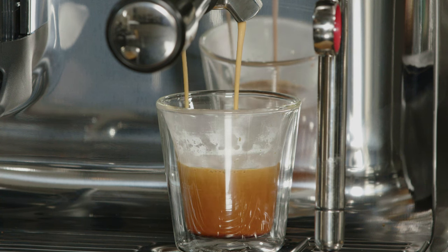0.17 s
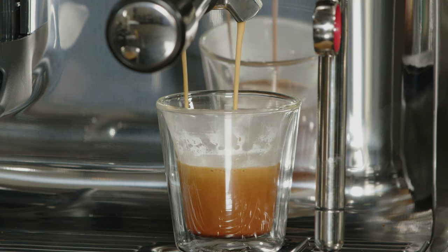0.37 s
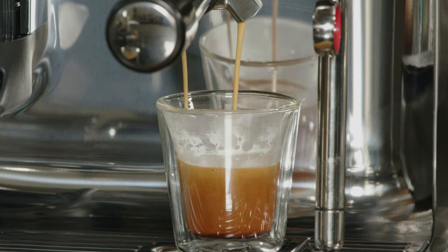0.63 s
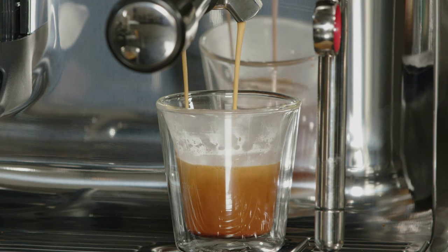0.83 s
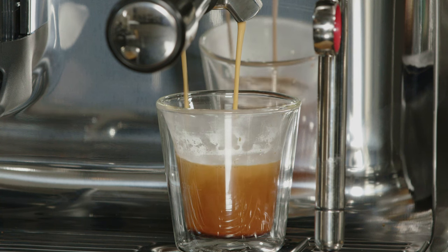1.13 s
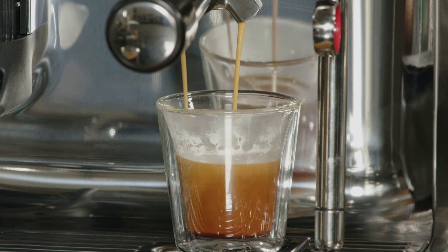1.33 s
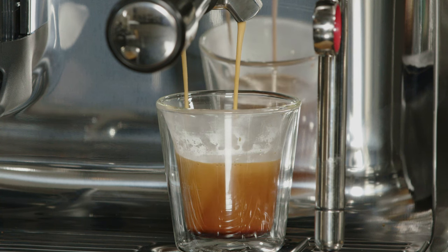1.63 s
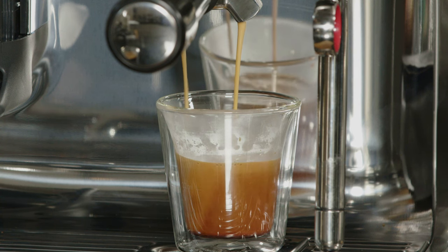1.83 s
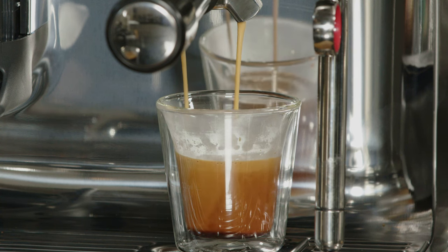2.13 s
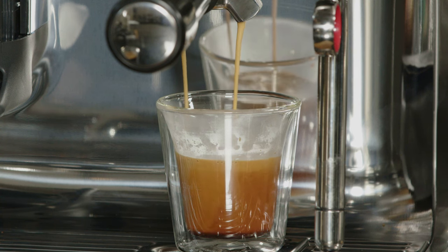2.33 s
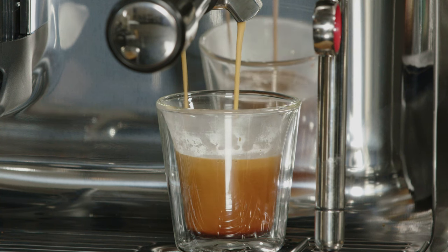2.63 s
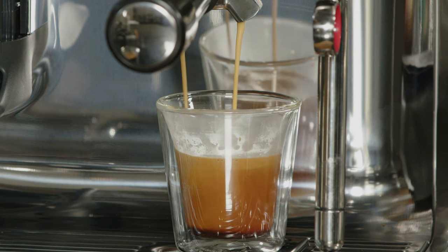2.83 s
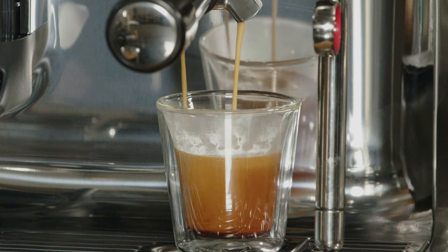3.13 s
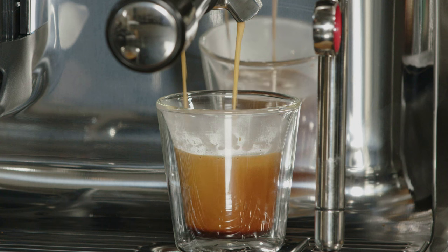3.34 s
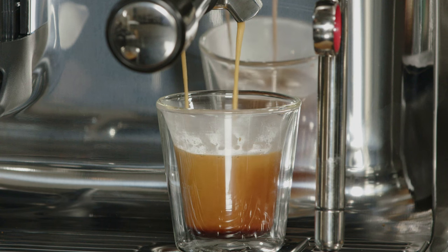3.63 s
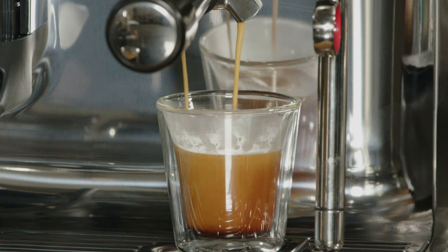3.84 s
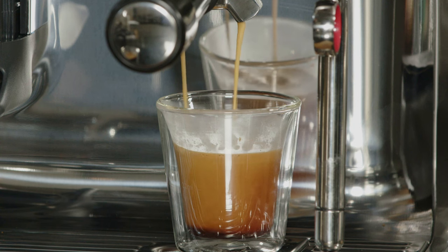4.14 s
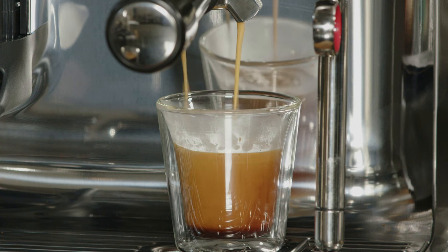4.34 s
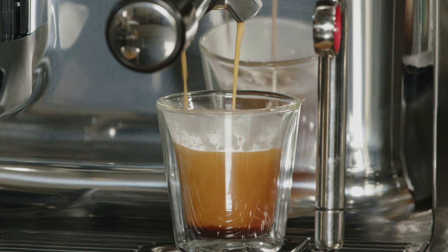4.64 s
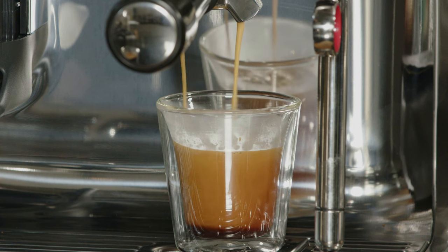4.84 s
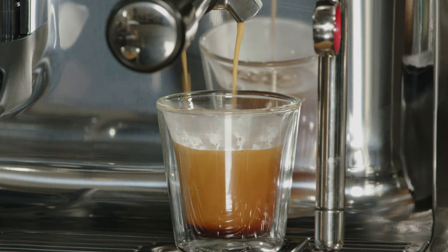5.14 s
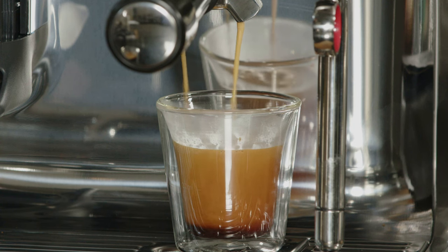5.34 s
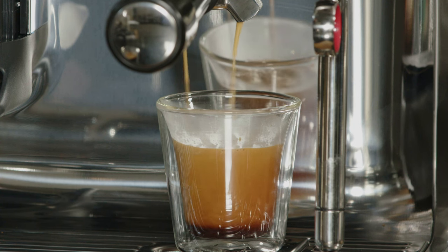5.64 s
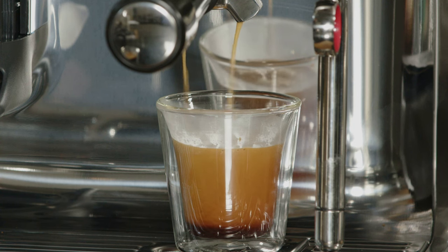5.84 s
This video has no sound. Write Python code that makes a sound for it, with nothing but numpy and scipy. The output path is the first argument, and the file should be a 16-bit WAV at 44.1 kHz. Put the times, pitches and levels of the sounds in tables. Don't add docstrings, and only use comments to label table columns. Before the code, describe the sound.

Close to the microphone, an espresso machine's vibrating pump hums low and buzzy, wavering about five times a second with a loose casing rattle. After three seconds it settles into a steadier drone. Faint hiss and tiny water drips sit underneath. At five seconds it stops with a dull knock and a flurry of metallic clicks, leaving quiet kitchen air and a faint low rumble.

```python
import sys
import numpy as np
from scipy import signal
from scipy.fft import rfft, irfft
from scipy.io import wavfile
from scipy.ndimage import uniform_filter1d

SR = 44100
rng = np.random.default_rng(int(sys.argv[2]) if len(sys.argv) > 2 else 0)


def boost(x):
    u = np.asarray(x, float) / 20
    return 10 ** u


def inscribe(sig):
    pcm = np.round(np.clip(np.atleast_2d(sig).T, -1, 1) * 32767)
    wavfile.write(sys.argv[1], SR, pcm.astype(np.int16))


N = 263277
TIME = np.arange(N) / SR
MAINS_HZ, STOP_S = 60.006, 5.076
STROKES = MAINS_HZ * TIME - .05


def evened(x):
    return x / np.sqrt(np.mean(x ** 2) + 1e-20)


def coloured(x, hz, db):
    bins = np.fft.rfftfreq(len(x), 1 / SR)
    gain_db = np.interp(np.log(bins + 1), np.log(np.add(hz, 1)), db)
    return irfft(rfft(x) * boost(gain_db), len(x))


def resonate(x, hz, width):
    turn = np.exp(2j * np.pi * np.cumsum(hz * np.ones(len(x))) / SR)
    r = np.exp(-np.pi * width / SR)
    return 2 * (turn * signal.lfilter([1 - r], [1, -r], x / turn)).real


def resonate_twice(x, hz, width):
    return resonate(resonate(x, hz, width), hz, width)


def smooth_twice(x, size):
    return uniform_filter1d(uniform_filter1d(x, size), size)


def add(mix, s, sound):
    part = mix[round(s * SR):][:len(sound)]
    part += sound[:len(part)]


def ring(hz, t60, rise_s, tone_share, width_share):
    t = np.arange(round(.25 * SR)) / SR
    fuzz = resonate_twice(rng.standard_normal(len(t)), hz, width_share * hz)
    tone = tone_share * np.sin(2 * np.pi * hz * t) + (1 - tone_share) * evened(fuzz)
    return tone * boost(-60 * t / t60) * (1 - np.exp(-t / rise_s))


def per_stroke(spread_db):
    strengths = boost(spread_db * rng.standard_normal(int(STROKES[-1]) + 2))
    return strengths[np.floor(STROKES).astype(int) + 1]


def running(coast_s):
    return np.exp(-np.maximum(TIME - STOP_S, 0) / coast_s)


def slipping():
    # middle of the slip in seconds, depth from 0 to about 1.
    slips = [(0.13, 0.98), (0.35, 0.95), (0.52, 0.91), (0.73, 0.98), (0.94, 1.05), (1.14, 1.04),
             (1.36, 0.55), (1.55, 1.03), (1.77, 0.5), (1.94, 1.04), (2.15, 1.01), (2.33, 1.03),
             (2.55, 0.89), (2.72, 1.05), (2.95, 1.04), (3.15, 0.72)]
    slip_s = .043
    slip = sum(depth * np.exp(-((TIME - s) / slip_s) ** 4 / 2) for s, depth in slips)
    return uniform_filter1d(np.clip(slip, 0, 1), 900)


def settling():
    settle_at_s, settle_s = 3.1, 0.12
    return 1 - np.exp(-np.maximum(TIME - settle_at_s, 0) / settle_s)


def orders():
    # multiple of mains, dB gripping, dB slipping, dB settled.
    direct = [(1, -70, -66, -67), (2, -54, -52, -53), (6, -62, -65, -65), (7, -61, -63, -60),
              (8, -47, -49, -48), (10, -67, -69, -66), (11, -74, -75, -75), (14, -74, -83, -79),
              (17, -87, -81, -82), (19, -74, -75, -78), (21, -83, -82, -92), (22, -78, -77, -80),
              (25, -86, -84, -85), (26, -87, -87, -91), (27, -95, -89, -103), (28, -94, -97, -93),
              (29, -96, -100, -87)]
    shaken = [(3, -76, -82, -86), (4, -69, -70, -68), (5, -66, -73, -70), (9, -73, -72, -72),
              (12, -92, -80, -87), (13, -84, -72, -79), (15, -83, -81, -86), (16, -105, -85, -87),
              (18, -79, -81, -77), (20, -89, -86, -84), (23, -84, -96, -87), (24, -83, -89, -84)]
    # half multiple of mains, then dB as for the direct lines.
    alternate = [(3.5, -76, -75, -77), (4.5, -77, -79, -76), (5.5, -69, -74, -75), (8.5, -70, -71, -71),
                 (9.5, -85, -81, -83), (11.5, -84, -91, -85), (12.5, -94, -89, -85), (13.5, -90, -83, -84),
                 (20.5, -97, -101, -92), (28.5, -105, -96, -95), (29.5, -108, -98, -96)]
    # multiple of mains, level in dB.
    valve_lines = [(32, -96), (33, -94), (36, -92), (37, -100), (38, -98), (39, -94), (41, -100), (42, -88),
                   (43, -89), (44, -92), (45, -99), (46, -97), (47, -98), (48, -98)]
    slip_late_ms, casing_turn, shaken_turn, alternate_turn = 0.042, .3, 1.9, 2.15
    late = 2 * np.pi * MAINS_HZ * slip_late_ms / 1000
    lines = [(*row, late * row[0] + casing_turn * (row[0] > 2)) for row in direct]
    lines += [(*row, shaken_turn) for row in shaken]
    lines += [(*row, alternate_turn) for row in alternate]
    lines += [(k, db, db, db, late * k + casing_turn) for k, db in valve_lines]
    return lines


def hum():
    slip = np.roll(slipping(), round(0.01 * SR))
    settled, lines, out = settling(), orders(), np.zeros(N)
    arch = np.clip(1.15 * smooth_twice(slip, 2600), 0, 1) ** 2
    for (k, grip_db, slip_db, calm_db, lag), start in zip(lines, rng.random(len(lines))):
        glide = np.clip(.22 * (slip_db - grip_db - 2), 0, 1.6) * (1 - arch)
        change = boost(slip_db) * np.exp(1j * (glide - lag)) - boost(grip_db)
        early = boost(grip_db) + change * slip
        size = early + settled * (boost(calm_db) * np.exp(-.5j * lag) - early)
        if k < 15:
            offset = start
        elif k < 27:
            offset = .15 * start - .24 * k - .024 * (k - 20) ** 2
        else:
            offset = .15 * start + (np.cos(np.pi * k * .19) < 0) / 2
        phase = k * (STROKES - .17) + offset
        out += np.sqrt(2) * (size * np.exp(2j * np.pi * phase)).real
    return out * running(0.0012)


def rattle():
    # frequency in Hz, level unsettled in dB, level settled in dB.
    casing = [(40, -110, -110), (130, -81, -86), (200, -82, -86), (290, -82, -92), (380, -77, -87),
              (440, -76, -81), (490, -73, -79), (575, -83, -89), (790, -88, -98), (1100, -91, -97),
              (1350, -93, -100), (1650, -97, -104), (2100, -103, -108), (4000, -135, -135)]
    hz, loose_db, calm_db = np.transpose(casing)
    fall = 1.7 + np.exp(-(STROKES % 1) / 1.0)
    push = evened(rng.standard_normal(N) * fall * per_stroke(1.8))
    settled = settling()
    loose = coloured(push, hz, loose_db) * boost(2 * slipping())
    calm = coloured(push, hz, calm_db)
    per_band = np.sqrt(SR / 2 / 22)
    return per_band * (loose + settled * (calm - loose)) * boost(1.6 * (settled - 0.5)) * running(0.17)


def coasting():
    coast = (TIME > STOP_S) * running(0.07) * rng.standard_normal(N)
    return boost(-32) * resonate(resonate(coast, 422, 74), 443, 74)


def ticks():
    # frequency in Hz, width in Hz, level in dB.
    valve = [(2030, 330, -87), (2600, 720, -83), (3100, 700, -90), (3730, 360, -85.5), (4500, 1530, -87.5),
             (5540, 2000, -87.5), (7740, 370, -100), (8730, 380, -99), (7300, 3800, -91.5)]
    settled = settling()
    place = (STROKES - .08) % 1
    second_puff = 0.49 * (place > .16) * np.exp(-(place - .16) / 0.27)
    puffs = 0.18 + np.exp(-place / 0.093) + second_puff
    uneven = per_stroke(0.89) * boost(0.72 * np.sign(np.sin(np.pi * STROKES)))
    shape = uniform_filter1d(puffs, 30) * uneven
    repeated = rng.standard_normal(735)[(place * 735).astype(int)]
    fresh = rng.standard_normal(N)
    alike = .45 + .35 * settled
    low_drive = fresh * shape * boost(-2.5 * settled)
    high_drive = (alike * repeated + np.sqrt(1 - alike ** 2) * fresh) * shape
    out = np.zeros(N)
    for hz, width, db in valve:
        drive = high_drive if hz > 3400 else low_drive
        out += boost(db - 1.2 * settled * (hz < 3400)) * evened(resonate_twice(drive, hz, width))
    return out * boost(-.55 * settled - 2.0) * running(0.021)


def taps():
    # start in seconds, peak in dB, frequency in Hz.
    hard_strokes = [
        (0.889, -59, 3740),
        (0.9573, -60, 3280),
        (1.1189, -64, 3370),
        (2.8614, -65, 3730),
        (3.6178, -61, 3720),
        (3.793, -60, 3700),
        (3.929, -59.5, 4470),
    ]
    out = np.zeros(N)
    for s, db, hz in hard_strokes:
        add(out, s, boost(db - 6.0) * ring(hz, 0.017, 0.00025, 0.072, 1.0))
    return out


def knocks():
    # start in seconds, peak in dB, frequency in Hz, t60 in seconds.
    casing_knocks = [
        (5.067, -33.5, 545.4, 0.08),
        (5.08, -49, 505, 0.15),
        (5.092, -44.5, 221.4, 0.16),
        (5.118, -34.5, 340, 0.012),
        (5.181, -51.5, 767, 0.064),
        (5.186, -48, 550, 0.03),
    ]
    out = np.zeros(N)
    for s, db, hz, t60 in casing_knocks:
        add(out, s, boost(db) * ring(hz, t60, 0.0014, 0.64, 0.17))
        add(out, s, boost(db - 26) * ring(1140, 0.11, 0.0073, 0, 1.0))
    return out


def clicks():
    # start in seconds, peak in dB, main ring in Hz, second ring in Hz, second ring in dB.
    lever_clicks = [(5.0667, -56, 2700, 3100, 2), (5.069, -64, 9100, 12100, -8),
                    (5.104, -64, 9300, 7800, -4), (5.149, -70, 12000, 9300, 2),
                    (5.085, -49.5, 3730, 3100, -9), (5.1065, -41.5, 3860, 5000, -12),
                    (5.1085, -54, 2150, 2940, 2), (5.114, -56, 5870, 5000, -11),
                    (5.122, -53, 4730, 5840, -18), (5.1423, -46, 4260, 4900, -10),
                    (5.143, -54, 5760, 6900, -21), (5.15, -60, 5630, 4230, 1), (5.1902, -63, 2940, 2210, 5),
                    (5.21, -79, 7100, 2600, 1), (5.2402, -56, 3850, 5800, -12),
                    (5.324, -62, 3600, 3100, -8), (5.328, -71, 5140, 4780, 1), (5.445, -68, 4760, 2900, -2)]
    out = np.zeros(N)
    for s, db, hz, hz2, db2 in lever_clicks:
        t60 = 0.023 * boost(-0.19 * (db + 58))
        main = ring(hz, t60, .001, .55, .2)
        second = ring(hz2, .8 * t60, .0012, .4, .22)
        crack = ring(hz, .02, .0012, 0, .45)
        add(out, s, boost(db) * (main + boost(db2) * second + boost(-9.0) * crack))
    return out


def hiss():
    # middle in seconds, length in seconds, top in dB, centre in Hz, width in Hz.
    leaks = [
        (0.892, .025, -81, 12000, 4000),
        (.94, .03, -83, 11200, 4000),
        (0.984, .036, -88, 13500, 4000),
        (1.22, 0.73, -84.5, 3310, 340),
        (3.952, 0.39, -81, 9900, 6200),
        (5.116, .17, -82.5, 8550, 8000),
        (4.349, 0.61, -89.5, 9000, 8000),
        (5.46, .11, -90, 2840, 250),
        (5.801, 0.99, -100, 2830, 250),
    ]
    ends_db = -19
    out = np.zeros(N)
    for middle, length, db, hz, width in leaks:
        place = np.linspace(-1, 1, round(length * SR))
        band = resonate_twice(rng.standard_normal(len(place)), hz, width)
        add(out, middle - length / 2, evened(band) * boost(db + ends_db * place ** 2))
    return out


def drips():
    # start in seconds, peak in dB, frequency in Hz.
    small_drips = [(0.5182, -70, 4500), (0.6818, -71, 4770), (0.9582, -73, 4800), (1.4955, -76, 4910),
                   (1.6357, -68, 4310), (1.9884, -74, 4320), (2.0597, -74, 4770), (2.5466, -73, 4720),
                   (3.2395, -77, 4590), (3.8257, -69, 4680), (4.504, -73.5, 4450), (4.9472, -71, 4680)]
    # start in seconds, peak in dB, frequency in Hz.
    fat_drops = [
        (1.634, -68, 2800),
        (2.5007, -64, 2550),
        (3.1572, -63, 2770),
        (3.254, -65.5, 2800),
        (3.3034, -64, 2630),
        (3.7935, -63, 2690),
    ]
    out = np.zeros(N)
    for s, db, hz in [*small_drips, *fat_drops]:
        add(out, s, boost(db + 2.5) * ring(hz, .03, 0.00099, .6, 0.23))
    return out


def walls(x):
    t = np.arange(SR // 2) / SR
    noise = rng.standard_normal(len(t)) * (t > .004)
    low = signal.lfilter([.15], [1, -.85], noise)
    tail = 2.5 * low * boost(-60 * t / 0.42) + (noise - low) * boost(-60 * t / 0.8)
    return signal.fftconvolve(x, tail / np.linalg.norm(tail))[:N]


def kitchen():
    # frequency in Hz, level in dB per Hz.
    room = [(24, -29), (40, -2.5), (64, -7.5), (117, -1), (139, -5), (170, -6.5), (202, -8.5), (483, -12),
            (668, -21), (2320, -32.5), (2770, -32.5), (3460, -38), (4330, -36), (6140, -40.5), (15400, -44)]
    # top in seconds, top in dB, fall on both sides in dB per second.
    rumble = [
        (.78, -69, 30),
        (1.21, -60.5, 81),
        (2.03, -60, 16),
        (2.46, -65.5, 18),
        (5.15, -66, 35),
        (5.6, -69, 51),
    ]
    room_db, rest_db = -66, -80
    lumps_db = evened(smooth_twice(rng.standard_normal(N), 2500)) / 2
    air = evened(coloured(rng.standard_normal(N), *np.transpose(room))) * boost(room_db + lumps_db)
    bass = evened(resonate_twice(rng.standard_normal(N), 70, 22))
    swells_db = [np.maximum(db - fall * abs(TIME - s), rest_db) for s, db, fall in rumble]
    return air + bass * boost(np.max(swells_db, axis=0) - 4)


def scene():
    sharp = ticks() + taps() + knocks() + clicks() + drips()
    pump = hum() + rattle() + coasting()
    return (pump + sharp + boost(-17.5) * walls(sharp) + hiss() + kitchen())[None]


def band_limit(x):
    return signal.sosfilt(signal.butter(12, 15590, fs=SR, output="sos"), x)


def record(dry):
    # middle of the dip in seconds, depth in dB, lowest frequency in Hz.
    dropouts = [
        (2.68, -14, 4700),
        (5.652, -11, 3000),
        (5.79, -11, 3000),
    ]
    for s, depth_db, hz in dropouts:
        high_pass = signal.butter(6, hz, "high", fs=SR, output="sos")
        treble = signal.sosfiltfilt(high_pass, dry)
        dry = dry - treble * (1 - boost(depth_db)) * np.exp(-((TIME - s) / 0.0086) ** 4)
    mix = dry * np.clip(TIME / 0.0016, 0, 1)
    return band_limit(mix)


dry = scene()
out = record(dry)
inscribe(out)
```